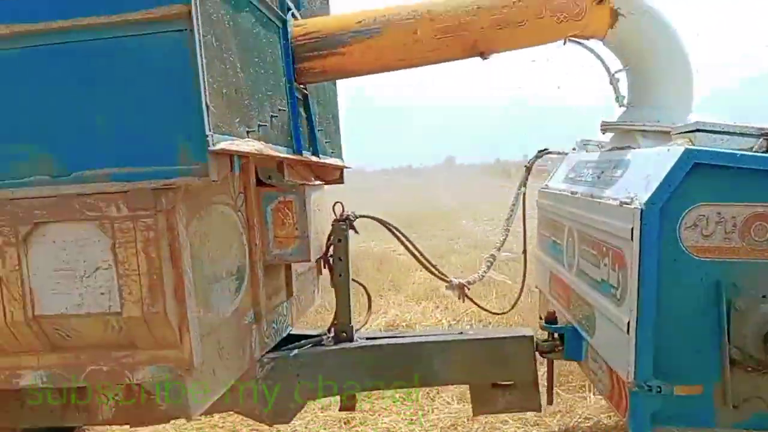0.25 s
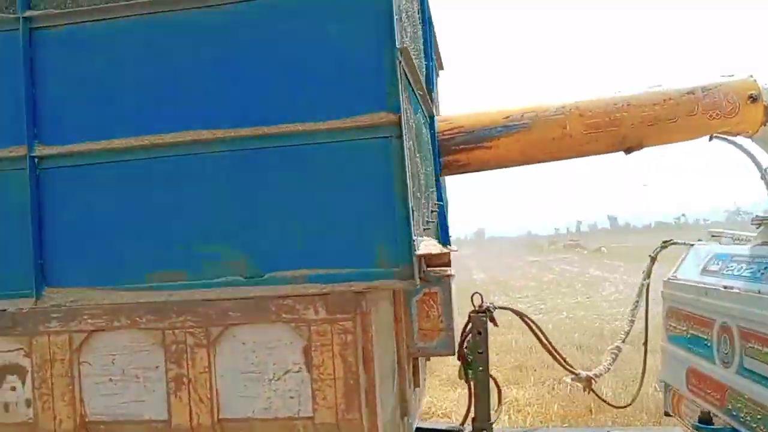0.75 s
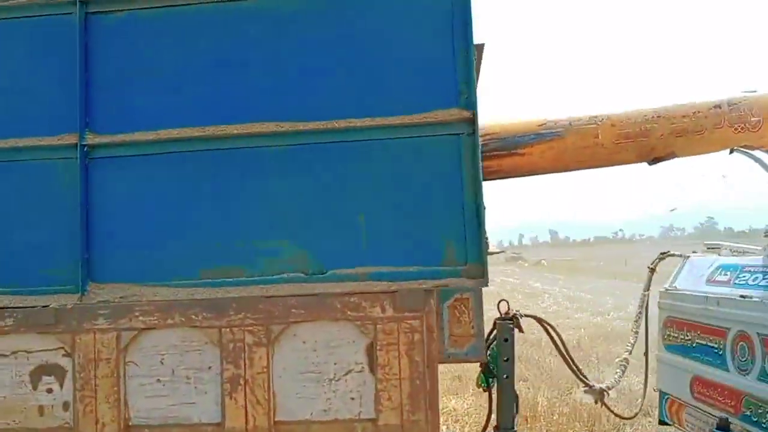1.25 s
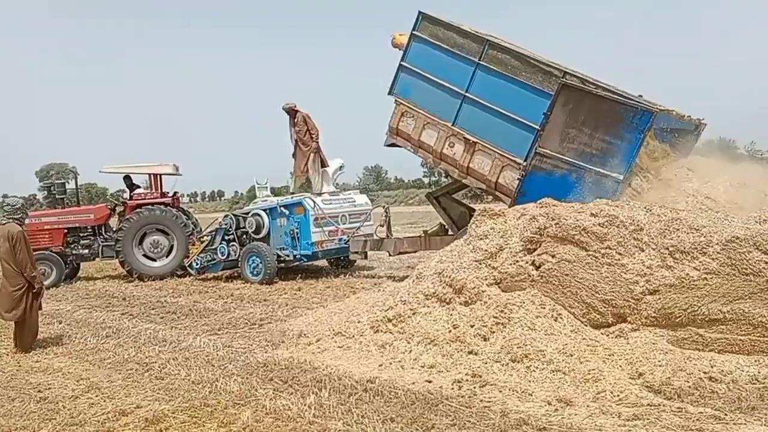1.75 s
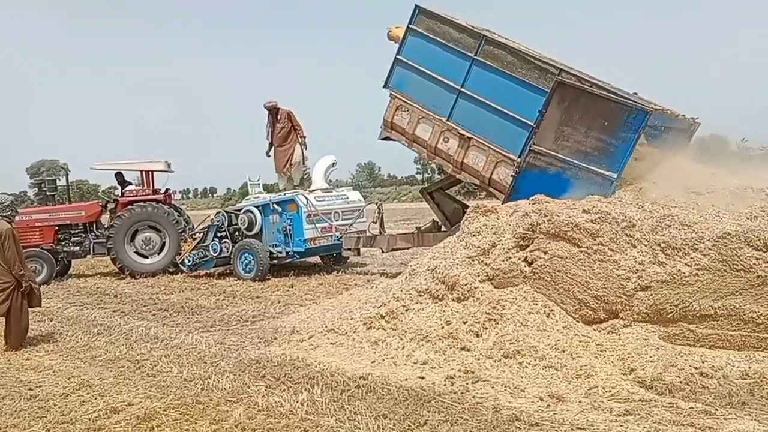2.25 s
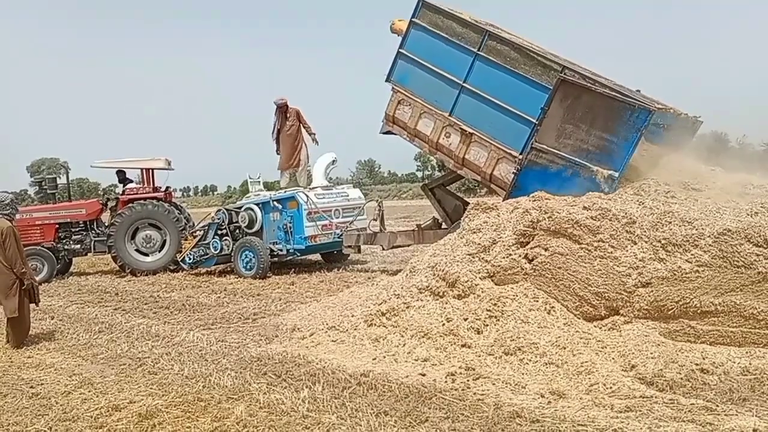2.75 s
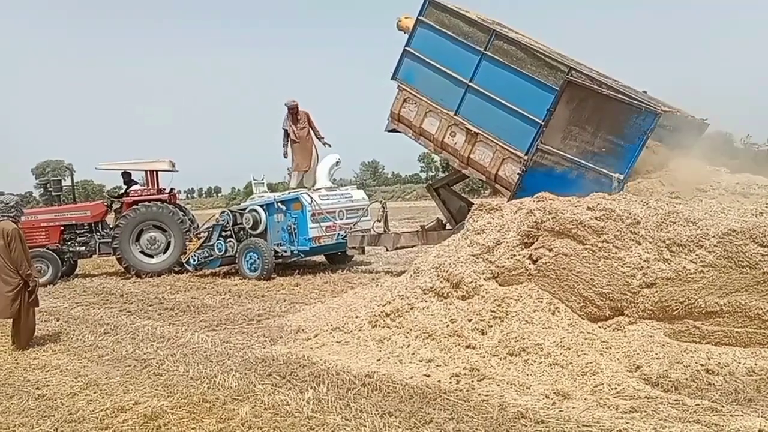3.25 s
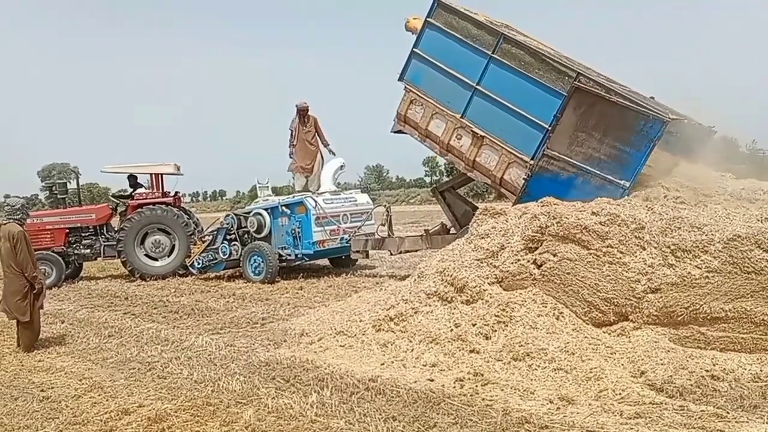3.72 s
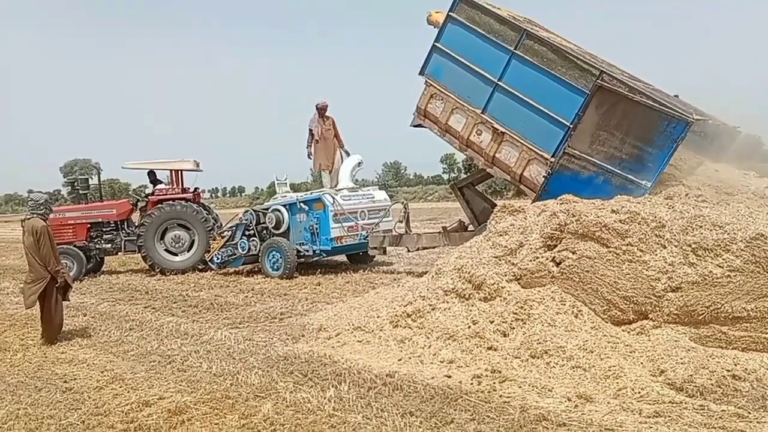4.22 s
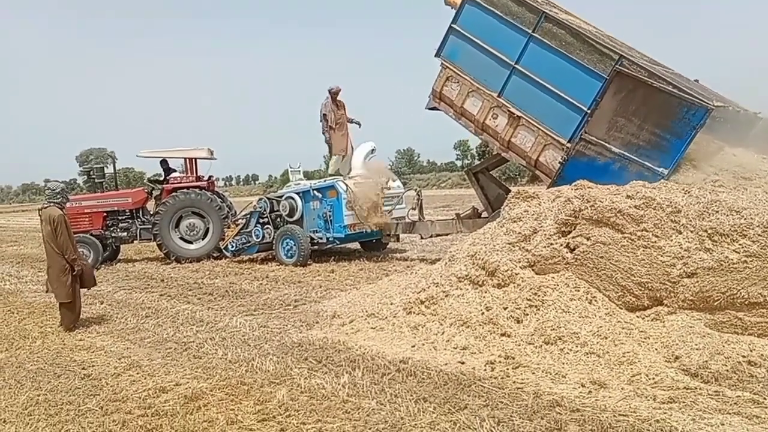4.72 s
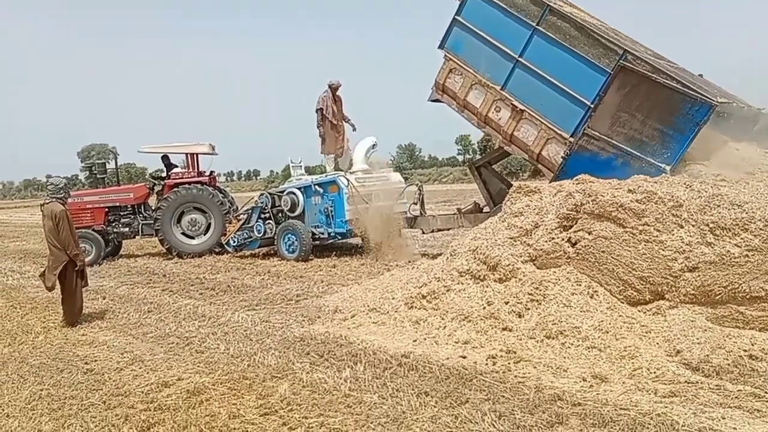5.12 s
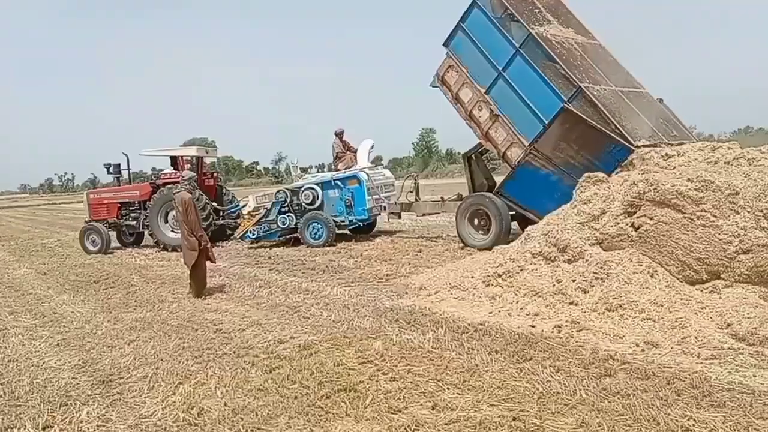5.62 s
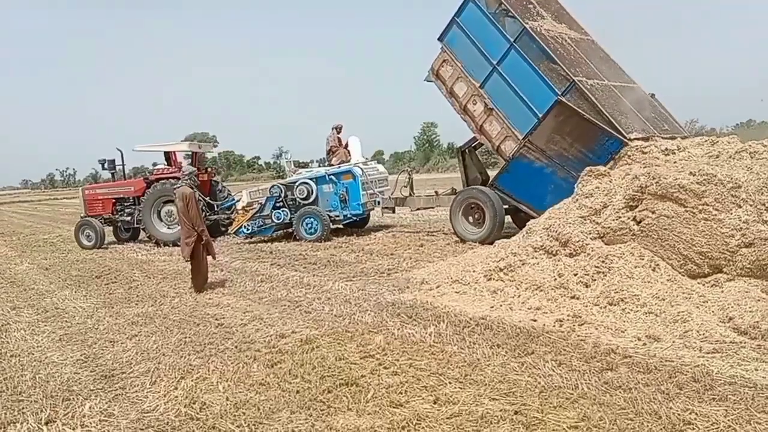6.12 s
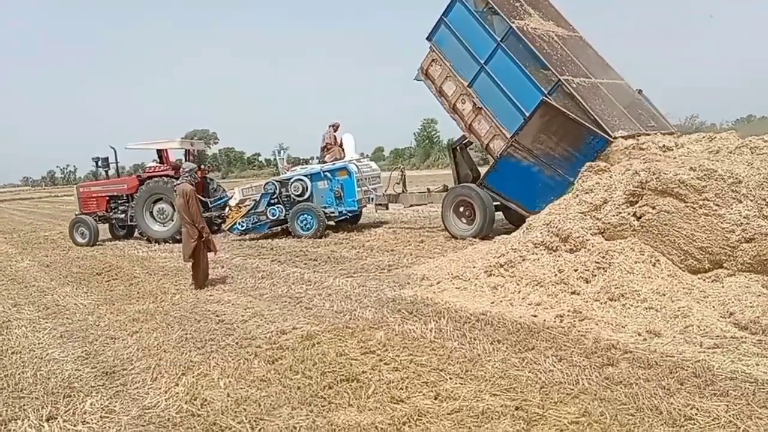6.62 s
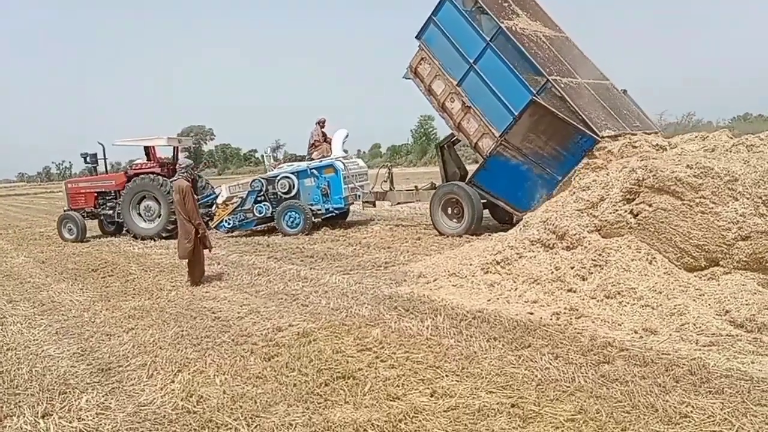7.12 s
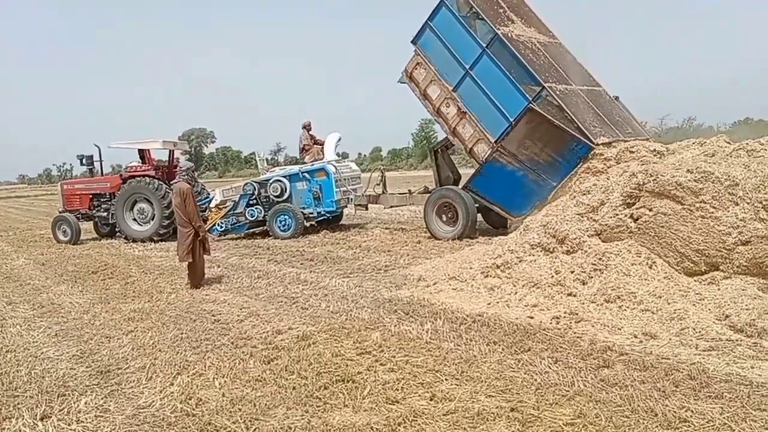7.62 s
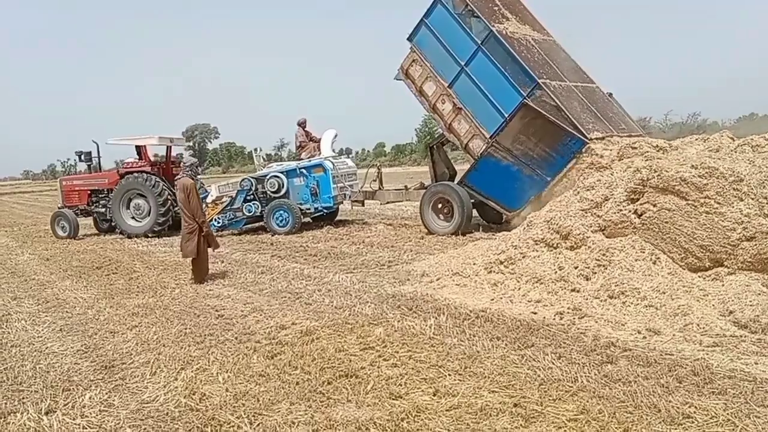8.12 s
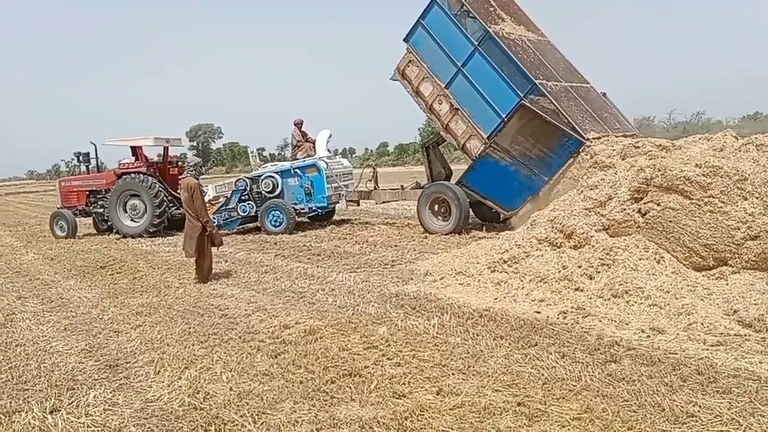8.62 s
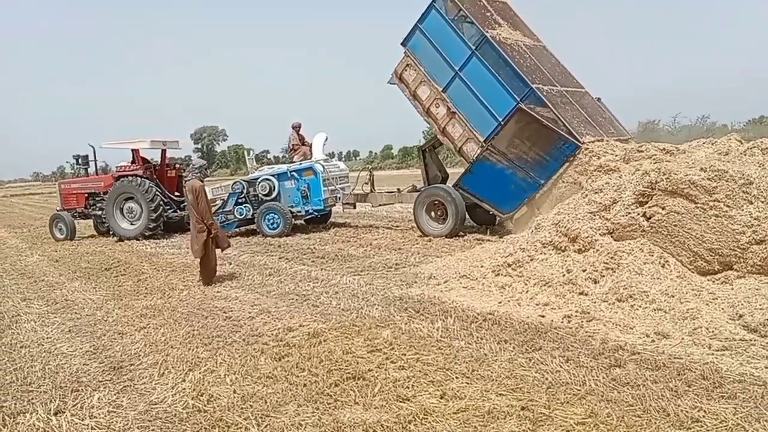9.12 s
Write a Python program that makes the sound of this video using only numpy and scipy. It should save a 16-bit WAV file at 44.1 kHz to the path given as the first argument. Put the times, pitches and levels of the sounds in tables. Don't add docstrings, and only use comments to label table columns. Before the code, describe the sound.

In an open stubble field, a straw chopper roars close to a phone, with drum rumble, rushing straw and buried diesel clatter. An abrupt cut brings a whistling blower and hard diesel knocking; three loads drag its pitch down before the engine surges. Another cut leaves a quieter, more distant tractor slowing in uneven steps, with dry chaff ticks and soft wind thumps.

```python
import sys
import numpy as np
from scipy import signal
from scipy.fft import rfft, irfft, next_fast_len
from scipy.io import wavfile
from scipy.ndimage import uniform_filter1d

SR = 44100
rng = np.random.default_rng(int(sys.argv[2]) if len(sys.argv) > 2 else 0)


def put_to_file(sound):
    columns = np.atleast_2d(sound).T
    safe = np.clip(columns, -1, 1)
    whole_steps = np.round(safe * 32767)
    wavfile.write(sys.argv[1], SR, whole_steps.astype(np.int16))


def amplitude_ratio(level_db):
    exponent = np.asarray(level_db, float) / 20
    return 10 ** exponent


N = 412323

# t/s, blades passing f/Hz
BLADE_CURVE = [(1.5, 313.7), (1.7, 323.2), (1.86, 320), (2.13, 297.9), (2.3, 319.7), (2.41, 327),
               (2.56, 325.3), (2.85, 298.7), (3.03, 283), (3.31, 319.8), (3.45, 321), (3.75, 319.4),
               (4.62, 320.4), (5.0, 293.1), (5.1, 296.5), (5.3, 319.6), (5.45, 326.3), (5.62, 323.3)]
# t/s, firing f/Hz, level/dB
TRACTOR_CURVE = [(5.62, 43.75, -30), (5.9, 43.86, -32), (6.05, 43.23, -31.5), (6.37, 39.86, -32.5),
                 (6.6, 40.93, -31.5), (6.9, 41.52, -32.5), (7.25, 39.07, -34.5), (7.5, 35.14, -36.5),
                 (7.78, 31.84, -35), (8.05, 32.3, -33), (8.3, 34.03, -33.5), (8.55, 33.08, -36),
                 (8.8, 31.86, -35.5), (9.0, 30.63, -34.5), (9.35, 30.7, -33.5)]
# f/Hz, level/dB per Hz
BESIDE_TONE = [(18, -62), (30, -27), (48, -27), (69, -19), (117, -7.5), (213, -6.5), (324, -2.5),
               (467, -13.5), (639, -6.5), (970, -10.5), (2420, -15.5), (3680, -22), (6890, -19),
               (9430, -40.5), (15500, -41)]
ACROSS_TONE = [(18, -73), (30, -28), (59, -32), (152, -6), (256, -7.5), (315, -8), (639, -15.5),
               (691, -19.5), (945, -6), (1200, -3.5), (1820, -10.5), (2180, -15.5), (4540, -16),
               (7460, -30.5), (15500, -64)]
FAR_TONE = [(18, -63), (30, -22), (81, -6), (120, -8), (168, -6), (350, -14.5), (606, -19), (970, -8.5),
            (1680, -11), (1970, -7), (3320, -2), (3680, -7), (4310, -22), (8500, -31), (15500, -79)]
# f/Hz, width/Hz, level/dB
BESIDE_SHAPE = [(101, 16, 3), (300, 90, 2), (480, 50, 3), (640, 69, 4), (776, 27, 7), (1040, 30, 1),
                (9400, 500, -4)]
ACROSS_SHAPE = [(683, 53, -10), (975, 29, 3), (1757, 161, -10.5), (2210, 150, 4.5), (2926, 106, -5),
                (4486, 460, -13), (5360, 300, 0), (5965, 250, -11), (9520, 470, -11.5), (11500, 600, -3.5),
                (12900, 300, 4), (14000, 500, 0), (15100, 400, 7)]
FAR_SHAPE = [(613, 93, -17), (975, 63, 2.5), (1597, 122, -13), (2380, 220, -6), (3200, 230, -14),
             (4550, 280, 4), (6050, 580, 0.5), (6760, 130, 10), (7270, 220, -3), (7600, 120, 6),
             (8480, 81, 6), (9380, 510, -7), (10600, 600, 5.5), (12050, 520, -6), (14000, 1200, 6),
             (15200, 400, 16)]
# multiple of the crank (far: firing) rate, level/dB (far: over the lowest band)
BESIDE_ORDERS = [(2, -31.5), (3, -27), (4.43, -34), (6, -36), (8.1, -38.5), (12, -50), (15.5, -31)]
ACROSS_ORDERS = [(2, -45), (3, -43), (3.5, -42), (4, -31), (4.5, -41), (5, -42), (5.5, -39), (6, -38),
                 (7, -42), (7.5, -43), (11, -41), (14, -44), (25, -36), (26, -34), (28, -39), (29, -34),
                 (30, -39), (31, -37), (32, -29), (33, -37), (34, -35.5), (36, -36)]
FAR_ORDERS = [(2, -5.5), (3, -12), (4, -5.5), (5, -13), (7, -12)]
# t/s, peak level/dB above 12 kHz
CHAFF = [(2.772, -39), (5.6567, -52), (6.2114, -58), (6.3856, -58), (6.9762, -52), (7.4482, -50),
         (7.5112, -57), (7.8088, -54), (8.619, -52), (8.9804, -59), (9.3083, -65)]
# t/s, peak level/dB at 60-300 Hz
PUFFS = [(7.201, -30), (7.399, -35), (7.707, -37), (7.82, -40), (8.013, -35), (8.11, -37), (8.287, -33),
         (8.582, -38), (8.86, -37), (8.96, -23), (9.01, -36), (9.071, -37)]
CUTS_S = (1.459, 1.503, 5.619)
# level/dB over the overall level, in bands split at 650, 1750 and 4500 Hz
BESIDE_BANDS_DB = (-2.5, -3, -12, -16)
BESIDE_RECEDE_SHARE = (1, 0.85, 0.073, 0.36)
# level/dB in bands split at 650, 1750, 4500 and 9300 Hz
ACROSS_BANDS_DB = (-28.5, -20, -24, -35, -55.5)
# fall in dB per Hz of sag, rise in dB per dB of surge, gain/dB while chaff pours out
SAG_DB_PER_HZ = (0.024, 0.069, 0.07, 0.066, 0.04)
SURGE_SHARE = (0.11, 0.41, 0.49, 0.5, 0.16)
RUSH_DB = (-0.5, .5, 1.5, 2, 3.5)
# t/s, boost level/dB, attack/s, hold/s
SURGES = [
    (2.127, 6, 0.0076, 0.14),
    (3.04, 9.5, 0.023, 0.14),
    (5.01, 7, 0.11, 0.095),
]
# level/dB over its curve at 600-1650, 1650-4500 and above 4500 Hz
FAR_BANDS_DB = (0.5, 1.5, -9.5)
# gain in dB per Hz of firing, as faster firing is brighter
BRIGHT_DB_PER_HZ = (0, 0.34, 0.28)
# t/s, depth level/dB, half length/s
LULLS = [(7.331, 9, .04), (7.614, 11, 0.065), (7.952, 8, 0.053), (8.25, 17, 0.071), (8.52, 5, 0.078),
         (8.74, 13, 0.038), (9.151, 13, 0.081)]


def on_time(table, t):
    s, *columns = np.transpose(table)
    return [np.interp(t, s, column) for column in columns]


def walk(n, rate):
    hold = int(SR / rate)
    steps = np.repeat(rng.standard_normal(n // hold + 3), hold)
    smooth = uniform_filter1d(uniform_filter1d(steps, hold), hold)
    return 1.302 * smooth[hold:n + hold]


def unit(x):
    return x / np.sqrt(np.mean(x ** 2))


def ring(x, hz, q):
    return signal.lfilter(*signal.iirpeak(hz, q, fs=SR), x)


def bell(t, centre, half):
    return np.exp(-0.5 * ((t - centre) / half) ** 2)


def colour(hz, tone, shape):
    f, db = np.transpose(tone)
    bumps_db = sum(d * bell(hz, c, w) for c, w, d in shape)
    return amplitude_ratio(np.interp(np.log(hz + 1), np.log(f), db) + bumps_db)


def knock(firing_hz, cylinders_db, scatter_db, decay, repeat, dull_hz, valve_db, valve_decay,
          valve_hz, block_hz):
    turns = np.cumsum(firing_hz) / SR
    parts = []
    for lag, fade in ((0, valve_decay), (1 / 3, decay)):
        stroke, phase = np.divmod(turns + 1 - lag, 1)
        stroke = stroke.astype(int)
        size_db = scatter_db * rng.standard_normal(2000) + np.resize(cylinders_db, 2000)
        place = phase / firing_hz * SR + 2000 * (stroke % 4)
        habit = np.interp(place, np.arange(8000), rng.standard_normal(8000))
        fresh = rng.standard_normal(len(turns))
        noise = np.sqrt(repeat) * unit(habit) + np.sqrt(1 - repeat) * fresh
        envelope = np.exp(-phase / fade) - np.exp(-phase / (0.029 * fade))
        parts.append(amplitude_ratio(size_db[stroke]) * envelope * noise)
    bright = signal.lfilter([1, -1], 1, parts[0])
    snap = unit(bright) + 0.61 * unit(ring(bright, valve_hz, 6))
    thud = signal.lfilter(*signal.butter(1, dull_hz, fs=SR), parts[1])
    block = ring(thud, block_hz, 5)
    return unit(amplitude_ratio(valve_db) * unit(snap) + unit(thud) + 0.11 * unit(block))


def machine(bursts, share, bands_db, edges_hz, tone, shape, full_knock_hz, swell_db, flicker_db):
    n = len(bursts)
    size = next_fast_len(n)
    hz = np.arange(size // 2 + 1) * SR / size
    gain = colour(hz, tone, shape)
    roar = rfft(rng.standard_normal(n), size) * gain
    clatter = rfft(bursts, size) * gain
    swell, out = walk(n, 6.88), 0
    for lo, hi, db in zip(edges_hz, edges_hz[1:], bands_db):
        band = 0
        slices = np.geomspace(lo, hi, 4)
        for a, b in zip(slices, slices[1:]):
            inside = (hz >= a) & (hz < b)
            mix = np.clip(share * min(b / full_knock_hz, 1), 0, 0.98)
            part = np.sqrt(1 - mix) * irfft(roar * inside, size)[:n]
            part = part + np.sqrt(mix) * irfft(clatter * inside, size)[:n]
            band = band + part * amplitude_ratio(swell_db * swell + flicker_db * walk(n, 14))
        out = out + unit(band) * amplitude_ratio(db)
    return out


def tones(hz, orders, waver_db, drift):
    n, out = len(hz), 0
    for multiple, db in orders:
        level = np.sqrt(2) * amplitude_ratio(db + waver_db * walk(n, 9.31))
        turns = np.cumsum(hz * (1 + drift * walk(n, 12.02))) / SR
        out = out + level * np.sin(2 * np.pi * (multiple * turns + rng.random()))
    return out


def beside(t):
    level_db, recede_db_per_s = -17.5, -1
    crank_hz = 40.98 * (1 + 0.002 * walk(len(t), 6.5))
    bands_db = [level_db + db + share * recede_db_per_s * t
                for db, share in zip(BESIDE_BANDS_DB, BESIDE_RECEDE_SHARE)]
    bursts = knock(2 * crank_hz, [2.5, -3, -1.0, 0.5], scatter_db=2.7, decay=0.24, repeat=0.53,
                   dull_hz=9600, valve_db=-0.5, valve_decay=0.2, valve_hz=7800, block_hz=2100)
    body = machine(bursts, 0.059, bands_db, (20, 650, 1750, 4500, 16000), BESIDE_TONE, BESIDE_SHAPE,
                   full_knock_hz=2800, swell_db=0.45, flicker_db=0.6)
    squeal = tones(4600 + 0 * t, [(1, -44)], 3, 0.0038) * bell(t, 0.48, 0.22)
    return body + tones(crank_hz, BESIDE_ORDERS, 2.6, 0.00624) + squeal


def surge(t):
    boost_db, release_s = 0, 0.07
    for s, db, rise, hold in SURGES:
        release = np.exp(-np.clip(t - s - rise - hold, 0, None) / release_s)
        boost_db = boost_db + db * np.clip((t - s) / rise, 0, 1) * release
    return boost_db


def across(t):
    blade_hz = uniform_filter1d(on_time(BLADE_CURVE, t)[0], size=3000)
    sag_hz = np.minimum(blade_hz - 320, 0)
    boost_db = surge(t)
    crank_hz = blade_hz / 8.393
    bursts = knock(2 * crank_hz, [-2.5, -2.0, -3.0, -1.5], scatter_db=1.6, decay=1.0, repeat=0.98,
                   dull_hz=10000, valve_db=2.8, valve_decay=0.64, valve_hz=7780, block_hz=2200)
    knock_share = 0.37 + 0.059 * boost_db
    start_s, end_s, ramp_s = 3.22, 5.01, 0.65
    rush = np.clip(np.minimum(t - start_s, end_s + ramp_s - t) / ramp_s, 0, 1)
    bands_db = [db + a * sag_hz + b * boost_db + c * rush
                for db, a, b, c in zip(ACROSS_BANDS_DB, SAG_DB_PER_HZ, SURGE_SHARE, RUSH_DB)]
    body = machine(bursts, knock_share, bands_db, (20, 650, 1750, 4500, 9300, 16000), ACROSS_TONE,
                   ACROSS_SHAPE, full_knock_hz=880, swell_db=0.4, flicker_db=0.55)
    block = amplitude_ratio(5.5) * unit(ring(bursts, 2320, 8))
    injectors = unit(ring(bursts, 7560, 5))
    hiss = (block + injectors) * amplitude_ratio(-58 + 1.7 * boost_db)
    whistle_db = -28 + 0.15 * (blade_hz - 320)
    whistle = tones(blade_hz, [(1, whistle_db), (2, -41)], 1.6, 0.0016)
    gear = tones(56 * crank_hz, [(1, -36 - 0.5 * np.abs(blade_hz - 319))], 1.5, 0.0005)
    exhaust = amplitude_ratio(0.12 * sag_hz + 0.16 * boost_db) * tones(crank_hz, ACROSS_ORDERS, 1.4, 0.0005)
    return body + exhaust + whistle + gear + hiss


def chaff():
    out, t = np.zeros(N), np.arange(500) / SR
    for s, db in CHAFF:
        i = int(s * SR)
        out[i:i + len(t)] += amplitude_ratio(db + 8) * np.exp(-t / 0.002) * rng.standard_normal(len(t))
    return signal.sosfilt(signal.butter(2, [9000, 15000], "band", fs=SR, output="sos"), out)


def far(t):
    firing_hz, level_db = on_time(TRACTOR_CURVE, t)
    faster_hz = firing_hz - 41
    mid_db, *rest_db = [level_db + db + k * faster_hz for db, k in zip(FAR_BANDS_DB, BRIGHT_DB_PER_HZ)]
    rest_db[-1] = rest_db[-1] + 5 * bell(t, 5.73, 0.03)
    lull_db = sum(db * bell(t, s, half) for s, db, half in LULLS)
    boom_db = level_db - 3.5 + 0.22 * faster_hz + walk(len(t), 6.7) - lull_db
    low_mid_db = mid_db - 10.0 + 0.4 * faster_hz - 0.11 * lull_db
    bursts = knock(firing_hz, [-1.5, -1.0, -5.0, -1.5], scatter_db=1.0, decay=0.46, repeat=0.42,
                   dull_hz=5700, valve_db=0, valve_decay=0.19, valve_hz=9200, block_hz=3850)
    bands_db = [boom_db - 7.0, low_mid_db, mid_db] + rest_db + [rest_db[-1] - 30]
    body = machine(bursts, 0.6, bands_db, (20, 260, 600, 1650, 4500, 11500, 16000), FAR_TONE, FAR_SHAPE,
                   full_knock_hz=4900, swell_db=0.32, flicker_db=1.0)
    tone_db = boom_db - 2.5 + 0.34 * (firing_hz - 40)
    return body + amplitude_ratio(tone_db) * tones(firing_hz, FAR_ORDERS, 1.3, 0.0078)


def puffs():
    gust, t = np.zeros(N), np.arange(8000) / SR
    for s, db in PUFFS:
        i = int(s * SR)
        push = amplitude_ratio(db + 24) * t / 0.014 * np.exp(-t / 0.013)
        gust[i:i + len(t)] += push[:N - i]
    band = signal.butter(4, [65, 270], "band", fs=SR, output="sos")
    return signal.sosfilt(band, gust * rng.standard_normal(N))


def scene():
    t, out = np.arange(N) / SR, chaff() + puffs()
    first_end, second, third = CUTS_S
    spots = ((beside, 0, first_end, 1e-4), (across, second, third, 0.003), (far, third, 10, 0.018))
    for source, start, end, fade_s in spots:
        now = (t >= start) & (t < end)
        fade = np.minimum((t[now] - start) / fade_s, (end - t[now]) / 0.00038)
        out[now] += source(t[now]) * np.clip(fade, 0, 1)
    return out[None]


def suppress(x, bass_hz, bass_knee_db, treble_hz, treble_knee_db, slope, most_db):
    hz, _, z = signal.stft(x, SR, nperseg=1024)
    power = uniform_filter1d(uniform_filter1d(np.abs(z) ** 2, size=5, axis=1), size=3, axis=0)
    treble_side_db = np.where(hz > treble_hz, treble_knee_db, -200)
    knee_db = np.where(hz < bass_hz, bass_knee_db, treble_side_db)[:, None]
    cut_db = np.clip(slope * (10 * np.log10(power + 1e-16) - knee_db), most_db, 0)
    return signal.istft(z * amplitude_ratio(cut_db), SR, nperseg=1024)[1][..., :len(x)]


def low_pass(x):
    return signal.sosfilt(signal.butter(12, 15670, fs=SR, output="sos"), x)


def record(dry):
    clean = suppress(dry[0], bass_hz=780, bass_knee_db=-63.5, treble_hz=9000, treble_knee_db=-94,
                     slope=1.6, most_db=-24)[None]
    mix = signal.sosfilt(signal.ellip(10, 0.2, 60, 15520, fs=SR, output="sos"), clean)
    return low_pass(mix)


dry = scene()
out = record(dry)
put_to_file(out)
```